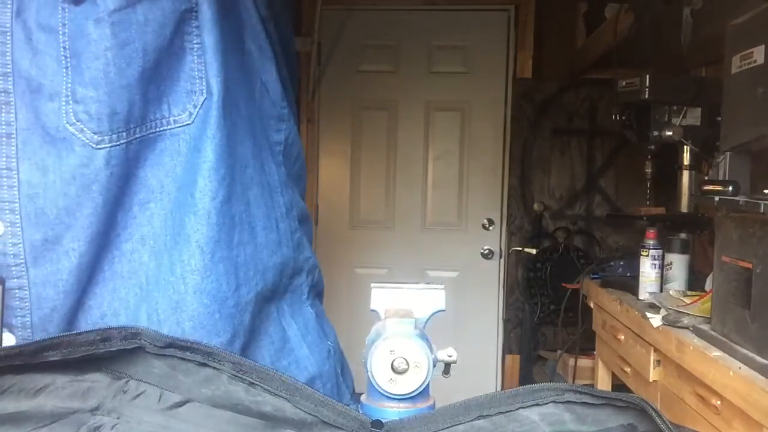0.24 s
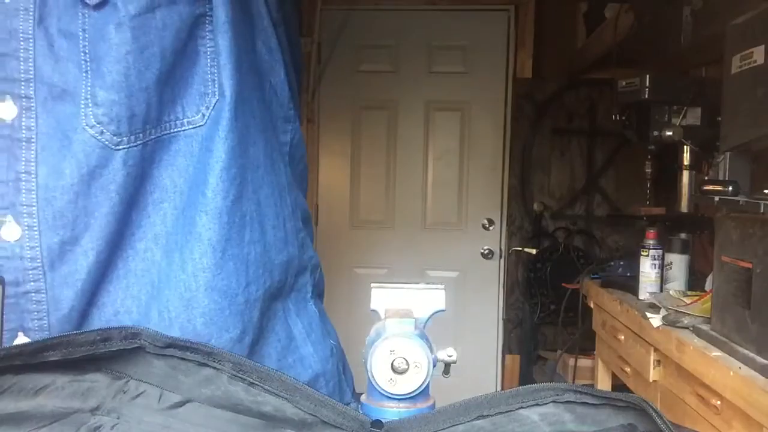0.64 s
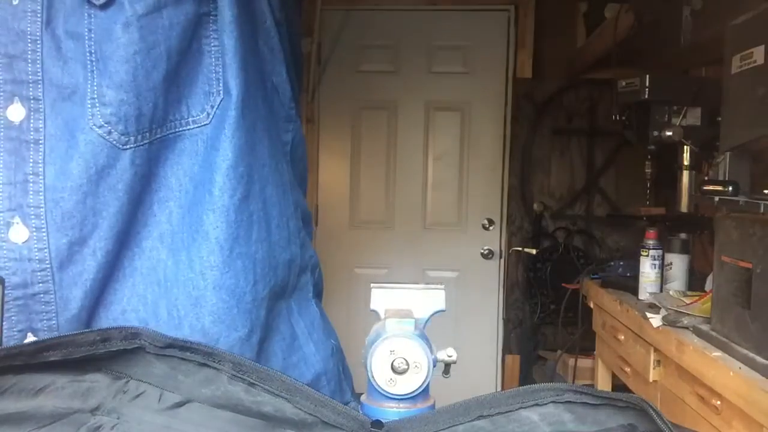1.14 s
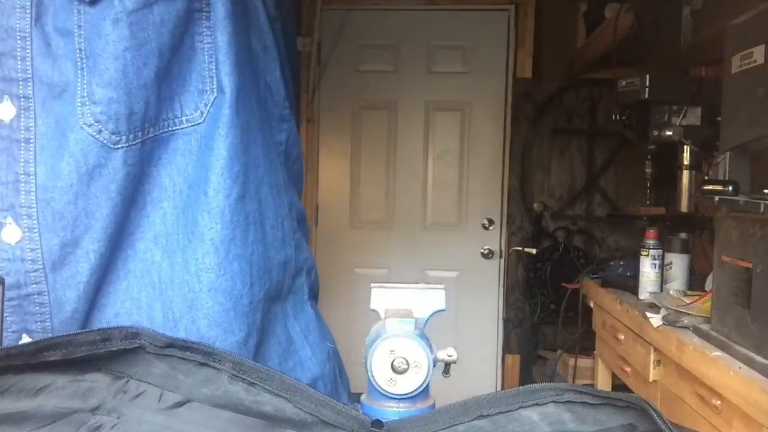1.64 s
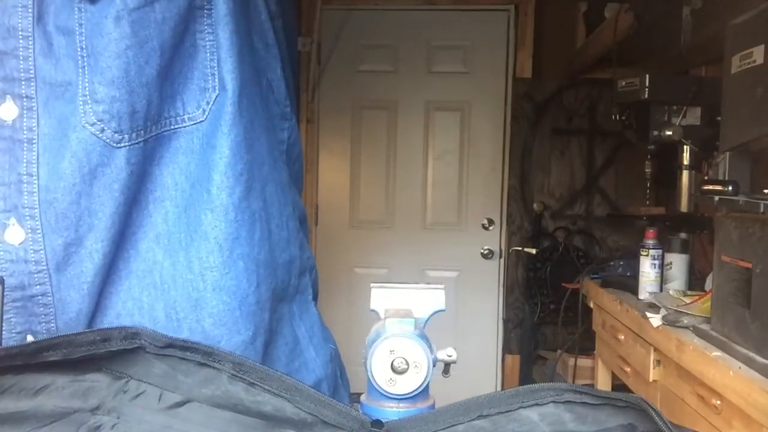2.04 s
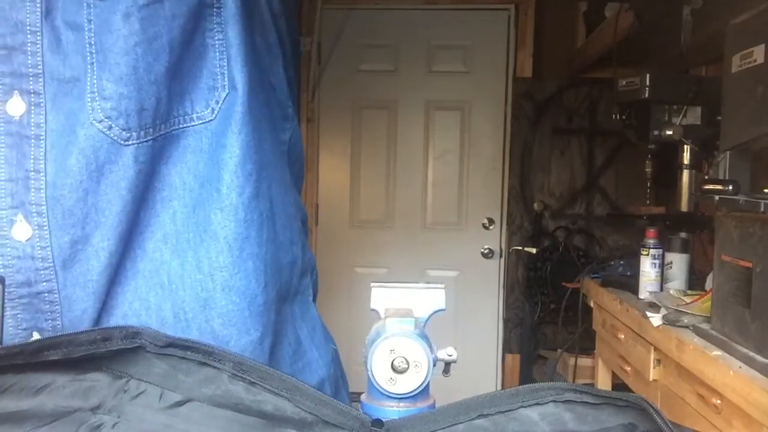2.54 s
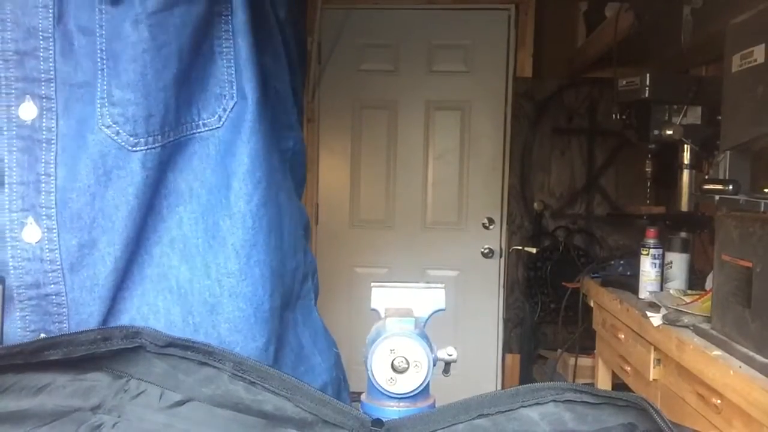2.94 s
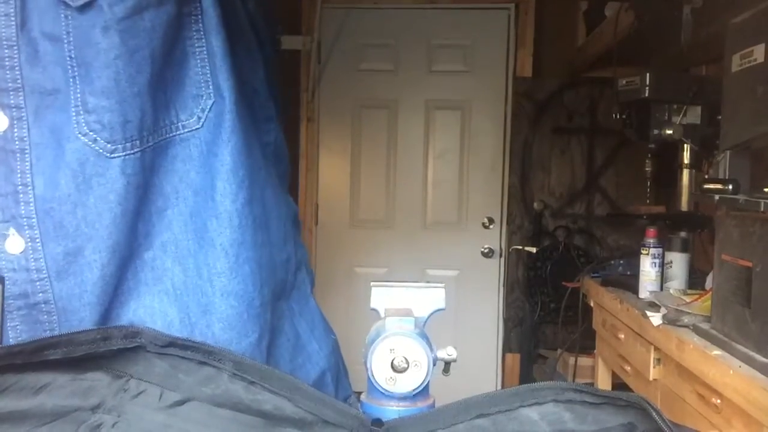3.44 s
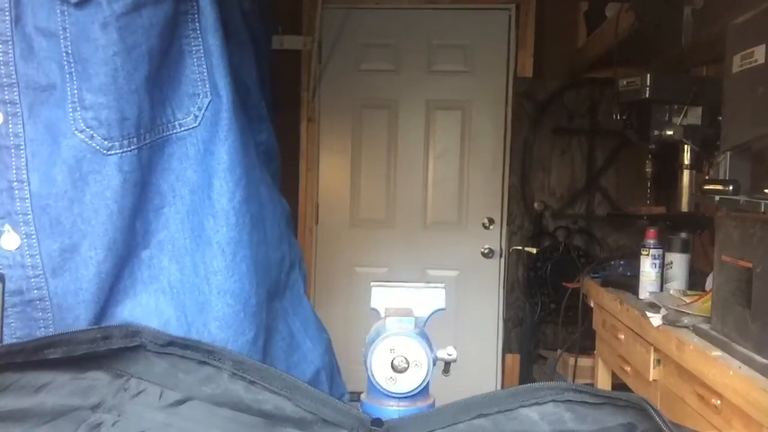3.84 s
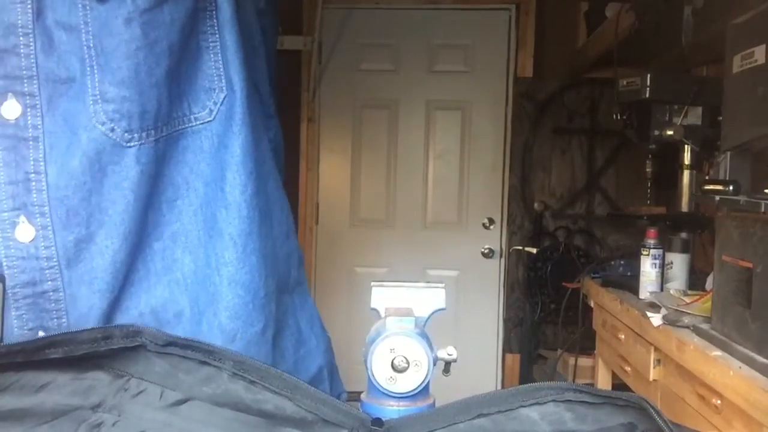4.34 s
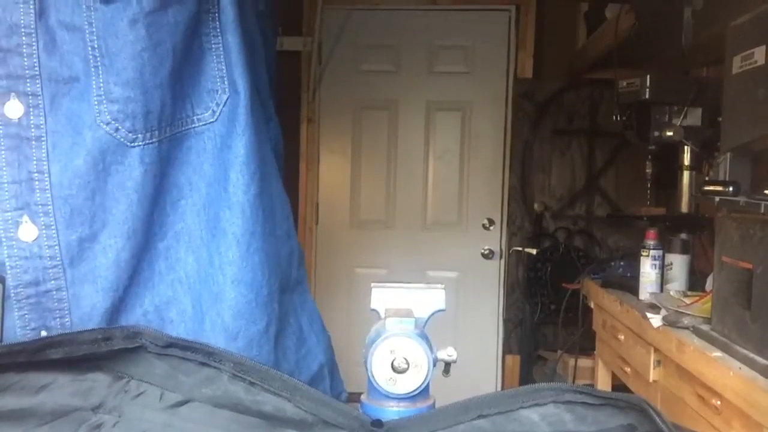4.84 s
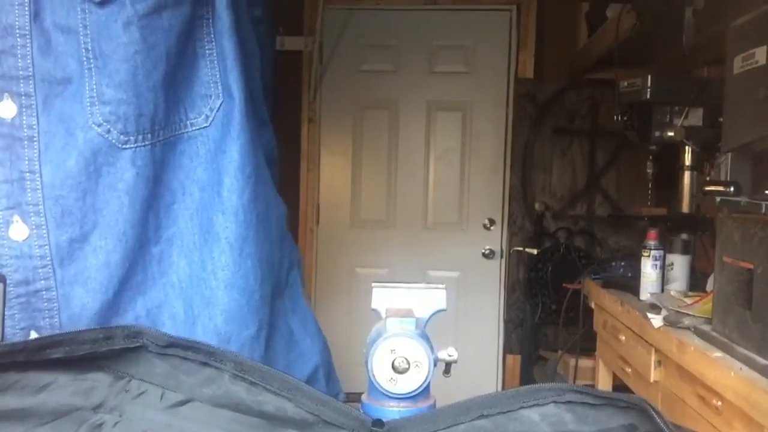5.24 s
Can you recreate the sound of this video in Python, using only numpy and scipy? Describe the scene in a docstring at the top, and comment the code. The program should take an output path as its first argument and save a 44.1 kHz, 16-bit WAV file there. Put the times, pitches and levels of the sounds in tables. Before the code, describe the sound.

Close up in a small cluttered workshop, hands adjust a window blind. Faint touches come first, then brief rasping slides around one second, a cluster of hollow knocks at two, and increasingly hard clacks and scrapes from three to four and a half seconds. After a pause, one heavy knock lands near five, then near quiet. The loudest hits distort slightly.

```python
"""A window blind is adjusted in short, juddering pulls right beside the microphone in a small workshop.
Sliding is dense stick-slip ticks through resonances and coloured filters; sudden slips are swelling
bursts of ticks. Knocks are swelling sine cycles with noise clatter and a ringing rail; handling is
filtered bumps. Quiet coloured noise is the room air, and the hardest knocks overload the recorder."""
import sys
import numpy as np
from scipy import signal
from scipy.fft import rfft, irfft
from scipy.io import wavfile

SR = 44100
rng = np.random.default_rng(int(sys.argv[2]) if len(sys.argv) > 2 else 0)


def dump_mix(stems):
    """Bounce the given channels to the path in sys.argv[1] as a 16-bit WAV at rate SR."""
    frames = np.atleast_2d(stems).T  # one column per channel
    limited = np.clip(frames, -1, 1)  # hard clip at full scale
    pcm = np.round(limited * 32767).astype(np.int16)
    wavfile.write(sys.argv[1], SR, pcm)


N = 242577
TIME = np.arange(N) / SR

# rasp spectrum of the sliding material: (frequency [Hz], relative level [dB])
SLIDE_COLOUR = [(150, -24), (260, -8), (400, -3.5), (550, -5.5), (750, -7), (950, -6), (1300, -7),
                (1800, -11.5), (2200, -9.5), (2560, -19.5), (2900, -14), (3400, -32.5), (4100, -50.5),
                (5200, -73.5), (8000, -97)]


def undb(db):
    """Decibels to gain."""
    return 10 ** (np.asarray(db) / 20)


def unit(x):
    """Scale to rms 1."""
    return x / np.sqrt(np.mean(x ** 2))


def curve(table):
    """Interpolate a (time [s], value) table at every sample."""
    time_s, value = np.transpose(table)
    return np.interp(TIME, time_s, value)


def add(out, start_s, x):
    """Mix x into out from start_s on."""
    i = max(int(start_s * SR), 0)
    out[i:i + len(x)] += x[:N - i]


def colour(x, points, size=4096):
    """Minimum-phase filter of unit energy shaped by (frequency [Hz], level [dB]) points."""
    hz, db = np.transpose(points)
    bin_hz = np.arange(size // 2 + 1) * SR / size
    log_gain = np.interp(np.log(bin_hz + 1), np.log(hz), np.log(undb(db)))
    # folding the cepstrum makes the response causal
    cepstrum = irfft(log_gain)[:size // 2]
    cepstrum[1:] *= 2
    response = irfft(np.exp(rfft(cepstrum, size)))
    return signal.fftconvolve(x, response / np.linalg.norm(response))[:len(x)]


def band(x, hz, width_hz):
    """One resonance."""
    b, a = signal.iirpeak(hz, hz / width_hz, fs=SR)
    return signal.lfilter(b, a, x)


def walk(knots_per_s):
    """Random wander, linear between knots, spread near 1."""
    knots = rng.standard_normal(N // 10)
    return np.interp(TIME * knots_per_s, np.arange(len(knots)), knots)


def ticks(per_s, spread_db):
    """Stick-slip: randomly timed impulses of either sign and uneven size, rms 1."""
    count = int(per_s * N / SR)
    places = rng.integers(0, N, count)
    sign = np.sign(rng.standard_normal(count))
    size_db = spread_db * np.clip(rng.standard_normal(count), -2, 2)
    return unit(np.bincount(places, sign * undb(size_db), N))


def swell(t, rise):
    """A contact that builds to 1 at time rise and dies away."""
    return t / rise * np.exp(1 - t / rise)


def room_air():
    """Quiet air of the room: coloured noise of slowly wandering level."""
    # (frequency [Hz], relative level [dB])
    air_colour = [(15, -44.5), (25, -17.5), (53, 0.5), (149, -2), (427, -18), (607, -12), (775, -27),
                  (962, -18.5), (1440, -31), (2050, -17), (2480, -26.5), (4870, -34.5), (6920, -31.5),
                  (10000, -41), (16000, -45.5)]
    return colour(rng.standard_normal(N), air_colour) * undb(-59 + 0.57 * walk(1.4))


def workshop(x, wet_db, t60_s):
    """A cluttered room returns a short, faint tail of decaying noise."""
    t = TIME[:SR // 2]
    tail = rng.standard_normal(len(t)) * undb(-60 * t / t60_s)
    tail *= t > .004  # gap before the first return [s]
    return x + undb(wet_db) * signal.fftconvolve(x, tail / np.linalg.norm(tail))[:N]


def handling(pull_db, rattle_db):
    """Soft bumps of the hands and the pulls rumble over a low boom; the loose rail rattles hollowly in fits."""
    # hand level before trim: (time [s], level [dB])
    hand_level = [(0.0, -65.5), (0.43, -53), (0.84, -64), (0.96, -47.5), (1.35, -42.5), (1.93, -57),
                  (1.99, -37.5), (2.2, -35.5), (2.3, -54.5), (2.86, -33), (3.02, -45.5), (3.08, -27.5),
                  (3.26, -38), (3.57, -33), (3.6, -15.5), (3.74, -34), (3.89, -25), (3.94, -32), (4.0, -22),
                  (4.07, -32), (4.23, -20.5), (4.49, -37.5), (5.02, -34), (5.08, -23.5), (5.3, -48.5),
                  (5.5, -57.5)]
    # spectra: (frequency [Hz], relative level [dB])
    rumble_colour = [(13, -62), (22, -47), (65, 5), (123, -2.5), (189, -1.5), (221, 2.5), (253, 1),
                     (320, -7), (420, -52), (700, -120)]
    rattle_colour = [(100, -25), (250, -2.5), (400, 5), (550, 16.5), (740, -4.5), (950, -1), (1500, -38.5),
                     (3000, -70), (6000, -110)]
    hands = undb(curve(hand_level) - 0.5)
    shake = np.hypot(hands, undb(pull_db - 14))
    sway = np.hypot(hands, undb(pull_db - 5))
    bumps = ticks(per_s=500, spread_db=1.5) * undb(1.5 * walk(22))
    rumble = colour(bumps * shake, rumble_colour)
    boom = undb(13) * band(bumps * sway, hz=69, width_hz=6.7)
    fits_db = 4 * walk(35)
    rattle_drive = ticks(per_s=250, spread_db=2.5) * undb(rattle_db + fits_db + 0.5)
    return rumble + boom + colour(rattle_drive, rattle_colour)


def blow(t, hz, cycles, fall):
    """A few swelling cycles; short bending waves run faster and arrive first, so the pitch falls."""
    fall = np.clip(fall, 0, .6)
    # the pitch passes hz at the peak of the swell
    turns = cycles * (t * hz / cycles) ** (1 - fall) / (1 - fall)
    return swell(t * hz, cycles) ** 2 * np.sin(2 * np.pi * turns)


def knocks():
    """A slat taps, then the blow gives a few cycles (a squeak if many), rebounds, clatters and rings the rail."""
    # nominal blows: (time [s], level [dB], pitch at peak [Hz], swell [cycles], pitch fall [0-1],
    # clatter re level [dB])
    knock_table = [(0.017, -44, 239, 4.4, .01, -21), (0.595, -36, 450, 0.84, 0.54, -7),
                   (1.445, -25.5, 409, 2.2, 0.13, -2), (1.615, -34, 424, 3.8, 0.11, -3.5),
                   (1.688, -33, 423, 2.4, 0.19, -1), (2.032, -16, 1285, 14.5, 0.11, 0),
                   (2.0549, -15.5, 1298, 11.6, 0.03, -10), (2.069, -14.5, 532, 4.8, 0.06, -11),
                   (2.159, -6, 672, 3.46, 0.12, -2.5), (2.596, -22, 1276, 3.9, 0.13, -14),
                   (2.613, -5, 520, 2.59, 0.4, -11), (2.765, -26, 288, 2.4, 0.18, -2),
                   (2.802, -17.5, 391, 4.1, .25, -6), (2.824, -13.5, 567, 5, 0.09, -3.5),
                   (2.836, -16.5, 263, 2.1, .06, -12.5), (2.896, -25, 403, 1.5, 0.42, -3.5),
                   (3.065, -8.5, 658, 3.7, 0, -2.5), (3.0945, -6.5, 563, 1.5, 0.04, -6),
                   (3.317, -30, 523, 3.6, 0.1, -4.5), (3.4513, -2, 2254, 2.8, 0.06, -23.5),
                   (3.502, -13.5, 427, 2.8, 0.14, -2.5), (3.564, -16.5, 543, 6.1, 0, -10),
                   (3.5878, -2, 617.5, 5.8, 0, -10.5), (3.594, -1.5, 398, 2.14, 0, -2.5),
                   (3.658, -12.5, 538, 2.6, 0.18, 0), (3.729, -12.5, 491, 2.9, 0.05, -11),
                   (3.841, -19, 537, 4.8, 0.08, -27), (3.982, 1, 550, 1.4, 0.09, -12),
                   (4.036, -16, 508, 3.9, 0.11, -11), (4.061, -16.5, 522, 2.7, .12, -7),
                   (4.187, -16.5, 560, 1.54, 0.25, -2), (4.218, -12, 344, 1.13, .3, 0.5),
                   (4.24, -9, 200, 0.95, 0.16, -9.5), (4.281, -5.5, 484, 2.57, 0.16, -2),
                   (4.326, -3.5, 493, 1.1, 0.46, -7), (4.371, -20, 600, 8.1, 0.06, 9),
                   (4.399, -14, 489, 2.3, 0.13, 0.5), (5.0621, 0.5, 599.4, 3.8, 0.06, -12),
                   (5.096, -25, 237, 4.2, 0.07, 1.5), (5.43, -41, 1102, 6.2, 0.12, -3)]
    # first contact and rebounds: (delay [s], pitch ratio, level [dB], ratio of cycles)
    contact_table = [(0, 1, -1, 0.98), (0.012, .76, -9.5, .45), (0.029, .42, -13.5, 0.17)]
    # rail modes: (frequency [Hz], relative level [dB], t60 [s])
    rail_modes = [(135, 1.5, 0.13), (260, -3, 0.095), (424.4, 2.5, 0.26), (470, -11, 0.24),
                  (603, 7.5, 0.13), (1110, -49.5, 0.19)]
    tap_hz, tap_db, tap_cycles, tap_lead_s = 1136, -19, 4.3, 0.00378
    rail_db = -64

    blows, clatter, t = np.zeros(N), np.zeros(N), TIME[:SR // 6]
    for start_s, db, hz, cycles, fall, clatter_db in knock_table:
        # a slat touches just before the rail
        tap = blow(t, tap_hz, tap_cycles, fall=0.052)
        add(blows, start_s - tap_lead_s, undb(db + tap_db) * tap)
        for delay_s, ratio, contact_db, stretch in contact_table:
            contact = blow(t, hz * ratio, cycles * stretch, fall)
            add(blows, start_s + delay_s, undb(db + contact_db) * contact)
        around_pitch = signal.butter(3, [.6 * hz, 1.6 * hz], "band", fs=SR, output="sos")
        chatter = unit(signal.sosfilt(around_pitch, rng.standard_normal(len(t))))
        # the root gives an abrupt start and a slow decay
        envelope = swell(t * hz, 2.1) ** .5
        add(clatter, start_s, undb(db + clatter_db) * chatter * envelope)

    ring = np.zeros(len(t))
    for hz, db, t60_s in rail_modes:
        ring += undb(db) * np.sin(2 * np.pi * hz * t) * undb(-60 * t / t60_s)
    struck = undb(1.5) * blows + undb(-3.5) * clatter
    return struck + undb(rail_db) * signal.fftconvolve(struck, ring)[:N]


def bursts(contacts):
    """A dense run of ticks under each swelling (time [s], level [dB], rise [s]) contact."""
    force, t = np.zeros(N), TIME[:SR // 5]
    for start_s, db, rise_s in contacts:
        add(force, start_s, undb(db) * swell(t, rise_s))
    return force * ticks(per_s=9000, spread_db=3.5)


def scrapes():
    """Sudden slips rasp; hard edges meet with a bright click."""
    # levels before trim: (time [s], rasp level [dB], edge click level [dB], time to swell [s])
    slip_table = [(0.994, -22, -53, 0.005), (1.095, -20.5, -55, 0.002), (1.274, -21.5, -40, 0.0033),
                  (1.375, -29, -54, 0.0026), (1.396, -21, -55, 0.0015), (1.4625, -29, -54, 0.0035),
                  (1.914, -43.5, -68, 0.0034), (1.989, -33, -45, .0016), (2.03, -28, -38, 0.0023),
                  (2.156, -17.5, -37, 0.0014), (2.214, -29.5, -52, 0.0045), (2.359, -29, -53, 0.0019),
                  (2.4544, -33, -43.5, 0.0016), (2.754, -27.5, -38, 0.0065), (3.093, -19, -24.5, .0016),
                  (3.452, 0.5, -17, 0.0002), (3.589, -11, -28.5, 0.0026), (3.615, -5, -40, 0.0014),
                  (3.642, -13, -34, 0.0058), (3.724, -14, -26.5, 0.0043), (3.834, -18.5, -29, 0.0019),
                  (3.883, -18, -47, .0027), (3.973, -7.5, -30, 0.0034), (4.113, -5, -5, .0015),
                  (4.253, -14.5, -37, 0.0023), (4.399, -9, -17, 0.0048), (4.536, -24.5, -13.5, 0.0056),
                  (4.647, -18, -24.5, 0.0031), (4.783, -36, -45, 0.0089), (4.84, -23, -19, 0.00074),
                  (4.937, -13.5, -25.5, 0.0089), (5.433, -39.5, -66, 0.0033)]
    # (frequency [Hz], relative level [dB])
    edge_colour = [(1500, -15), (3200, 11.5), (4300, -17), (5200, -16.5), (7000, 2.5), (8700, -9),
                   (10500, -29.5), (13000, -27.5), (16000, -36.5)]
    rasps = bursts([(start_s, rasp_db, rise_s) for start_s, rasp_db, _, rise_s in slip_table])
    clicks = bursts([(start_s, click_db, rise_s) for start_s, _, click_db, rise_s in slip_table])
    return undb(-4.5) * colour(rasps, SLIDE_COLOUR) + undb(-11.5) * colour(clicks, edge_colour)


def judder():
    """Level [dB] that jumps as each slat slips past and sags until the next."""
    slats_per_s, depth_db, drift_cycles = 37.9, 5.5, .35
    phase = slats_per_s * TIME + drift_cycles * walk(17)
    return depth_db * (.5 - phase % 1)


def pulls():
    """Slide, relative treble and rattle levels [dB]: each pull eases in, grows or fades, and coasts to rest."""
    # (time [s], time to take hold [s], length [s], level [dB], change over the pull [dB],
    # treble re level [dB], rail rattle re level [dB])
    pull_table = [(0.024, 0.037, 0.1, -75, 0.5, -5, -3), (0.323, 0.036, 0.16, -69, 16, -12, -4),
                  (0.476, 0.013, 0.12, -58.5, 0.5, -19, 0), (0.655, 0.025, 0.18, -67, -4, -13, -4),
                  (0.847, .012, 0.11, -60, 20, -16.5, -4), (0.936, 0.049, 0.061, -32.5, 0.5, -24.5, -6.5),
                  (1.016, 0.012, 0.099, -45.5, -5, -22, 11.5), (1.092, 0.032, 0.17, -35.5, 4.5, -27, -0.5),
                  (1.291, 0.034, .16, -41, -7, -27, 4.5), (1.51, 0.012, 0.18, -55.5, 3.5, -24, 10.5),
                  (1.788, 0.013, 0.12, -56.5, -5, -22.5, 14.5), (1.968, 0.034, 0.091, -27, -1, -22, -2),
                  (2.029, 0.016, 0.14, -38, 1, -22.5, 6.5), (2.227, 0.012, 0.17, -56, 7.5, -25, 3),
                  (2.432, 0.017, 0.18, -44.5, 0, -26.5, 4), (2.641, 0.024, 0.085, -43.5, -9, -41, 8),
                  (2.743, .008, 0.042, -39, -5, -21.5, 5), (2.805, 0.018, 0.073, -42, -2.5, -30, 2),
                  (2.967, 0.013, 0.088, -54.5, 15.5, -24.5, 4), (3.076, 0.024, 0.11, -34, 5, -22, -7.5),
                  (3.223, 0.027, 0.069, -47, 3, -30, 9.5), (3.286, 0.034, 0.038, -31.5, 2, -23.5, 6),
                  (3.355, 0.022, 0.15, -41, 5.5, -22, -2), (3.432, 0.017, 0.052, -30.5, -7, -15, 7.5),
                  (3.565, 0.02, 0.11, -26, -6.5, -23.5, 5), (3.711, 0.0062, 0.049, -35, 3, -22, -4),
                  (3.781, 0.047, .1, -30, -1.5, -19.5, 4), (3.939, 0.076, 0.05, -26, -0.5, -19, -13),
                  (4.016, 0.027, 0.17, -37, -4, -19.5, 13), (4.109, 0.0043, 0.013, -22.5, 0, -18.5, -1),
                  (4.193, 0.011, 0.28, -30, -21, -20, 10), (4.395, 0.0067, 0.0084, -19.5, 1.5, -27, 5),
                  (4.448, 0.015, 0.071, -37, 1, -16, 2), (4.527, 0.014, 0.032, -20.5, -2, -20.5, -4),
                  (4.598, 0.0093, 0.12, -33, -8, -26, 5.5), (4.764, 0.023, 0.093, -27.5, -1.5, -21, -2.5),
                  (4.886, .035, 0.16, -27.5, -15.5, -17.5, 4), (4.989, 0.01, 0.085, -38, -3, -44, 12),
                  (5.219, 0.013, 0.046, -54, -1, -22.5, 9), (5.276, 0.037, 0.056, -57.5, 9.5, -19.5, -2.5),
                  (5.435, .012, 0.035, -57, -0.5, -25, 3.5)]
    release_db_per_s = 264
    power = np.zeros((3, N))
    for start_s, grip_s, length_s, db, change_db, treble_db, rattle_db in pull_table:
        near = abs(TIME - start_s) < .5
        t = TIME[near] - start_s
        held_db = db + change_db * np.clip(t / length_s, 0, 1)
        release_db = release_db_per_s * np.maximum(t - length_s, 0)
        taking_hold = (1 + np.tanh(2 * (t / grip_s - .5))) / 2
        pull = taking_hold * undb(held_db - release_db)
        power[:, near] += np.outer(undb([0, treble_db, rattle_db]), pull) ** 2
    slide_db, high_db, hollow_db = 10 * np.log10(power + 1e-10)  # floor at -100 dB
    judder_db = judder()
    return slide_db + judder_db, high_db - slide_db, hollow_db + judder_db


def sliding(db, treble_db):
    """The material catches and lets go: fine slips rasp with fizz above, coarser catches ring the slats."""
    # resonances: (frequency [Hz], width [Hz], relative level [dB])
    slide_modes = [(544.5, 90, -3.5), (943, 180, -7.5), (1183, 60, -5), (1300, 20, -17), (1575, 70, -9.5),
                   (2054, 72, -11), (2320, 49, -5.5), (2820, 130, -17)]
    # spectra: (frequency [Hz], relative level [dB])
    fizz_colour = [(3000, -28.5), (4500, -10), (5250, -23.5), (6000, -3.5), (7000, 3.5), (8300, -5.5),
                   (10000, -25), (12000, -33), (15500, -51.5)]
    sheen_colour = [(900, -29.5), (1600, -10.5), (2150, 1.5), (2600, -7.5), (3100, -4.5), (3700, -16.5),
                    (4600, -32), (8000, -71)]
    pressure = undb(db + 2.3 * walk(80))
    slips = ticks(per_s=2600, spread_db=0.5) * pressure
    rasp = colour(slips, SLIDE_COLOUR)

    rings = np.zeros(N)
    for hz, width_hz, mode_db in slide_modes:
        # the point of contact wanders, so each catch favours a different resonance
        catches = ticks(per_s=110, spread_db=5.5) * pressure
        narrow = band(catches + 0.047 * slips, hz, width_hz)
        rings += band(narrow, hz, 4 * width_hz) * undb(mode_db + 3.0 * walk(25))

    crackle = ticks(per_s=990, spread_db=6.5) * pressure
    fizz_drive = (0.91 * slips + 0.34 * crackle) * undb(treble_db + 2 * walk(45))
    fizz = colour(fizz_drive, fizz_colour)
    # a thin sheen follows the treble level
    sheen_drive = ticks(per_s=1700, spread_db=0.5) * pressure * undb(treble_db)
    sheen = colour(sheen_drive, sheen_colour)
    return undb(3.0) * rasp + undb(20.0) * rings + undb(-2.05) * fizz + undb(9.5) * sheen


def scene():
    """The blind in the workshop over the quiet air of the room."""
    pull_db, treble_db, rattle_db = pulls()
    blind = handling(pull_db, rattle_db) + knocks() + scrapes() + sliding(pull_db, treble_db)
    return (room_air() + workshop(blind, wet_db=-11.0, t60_s=0.073))[None]


def record(dry):
    """The recorder rounds off peaks near full scale and cuts the top."""
    top_hz = 15900
    rounded = dry / (1 + dry ** 8) ** (1 / 8)
    low_pass = signal.ellip(10, .1, 80, top_hz, fs=SR, output="sos")
    return signal.sosfilt(low_pass, rounded)


dry = scene()
out = record(dry)
dump_mix(out)
```